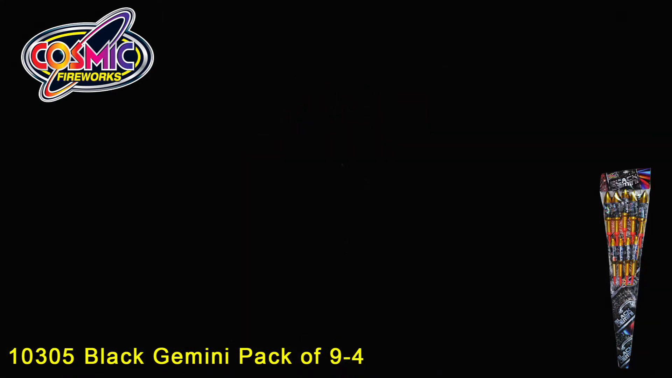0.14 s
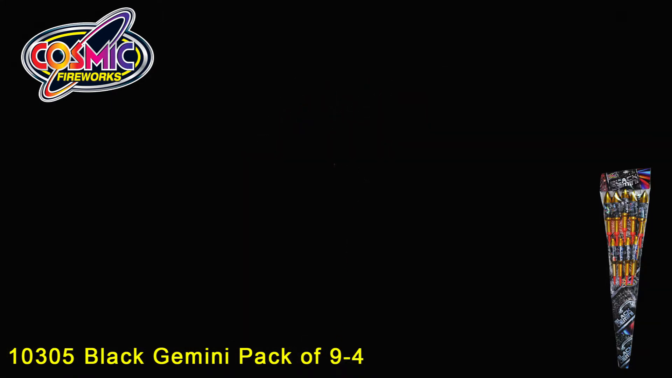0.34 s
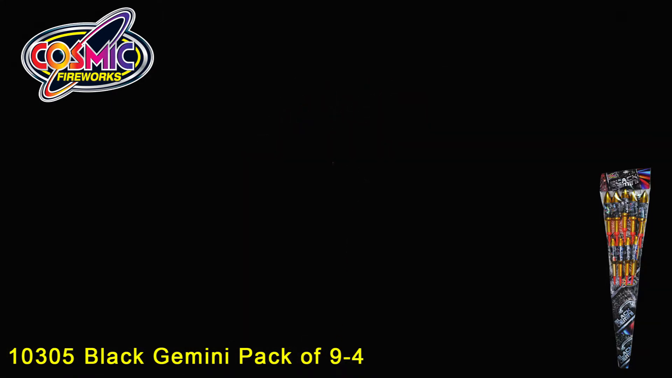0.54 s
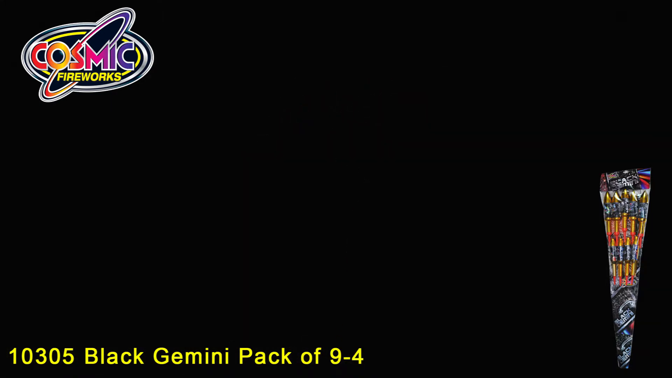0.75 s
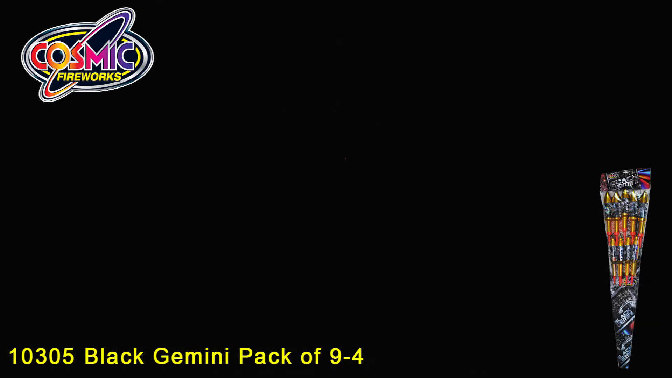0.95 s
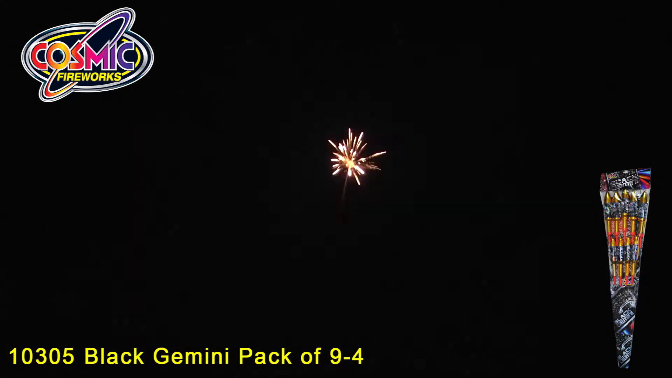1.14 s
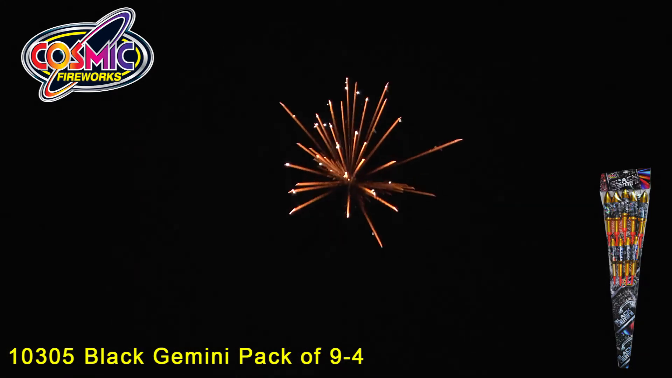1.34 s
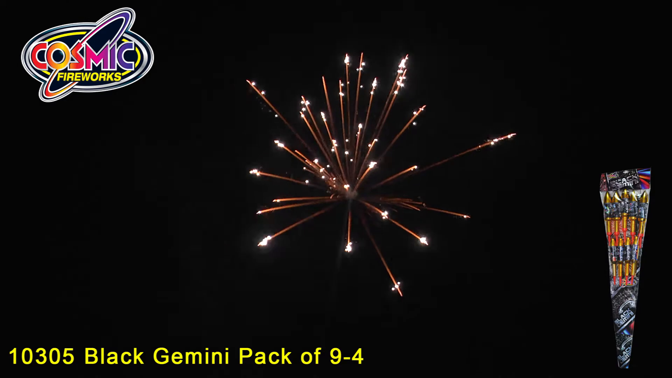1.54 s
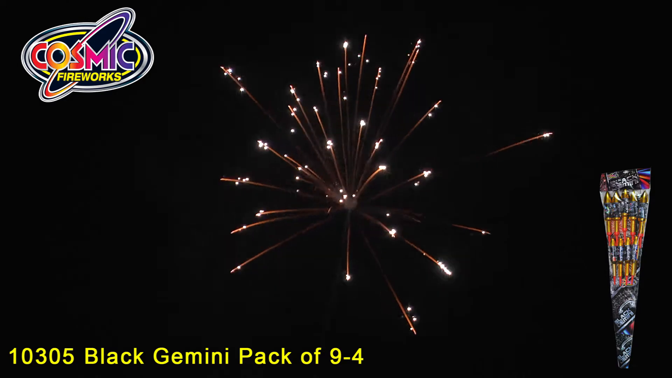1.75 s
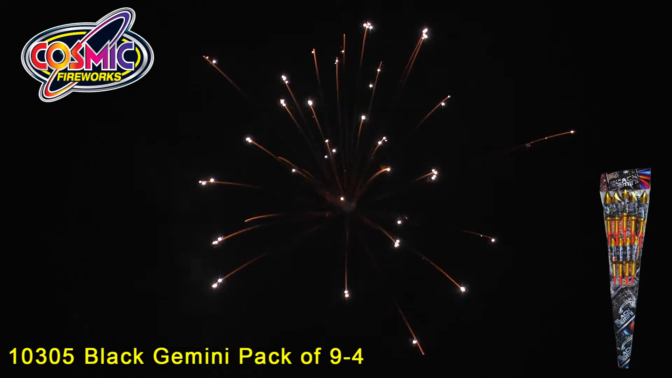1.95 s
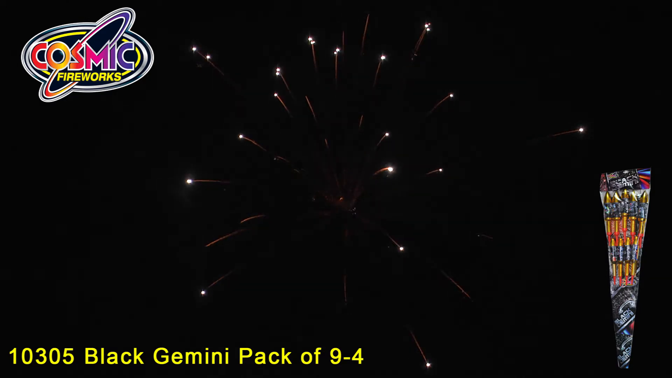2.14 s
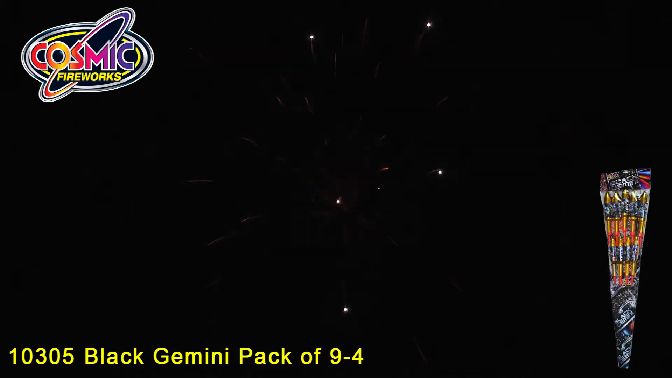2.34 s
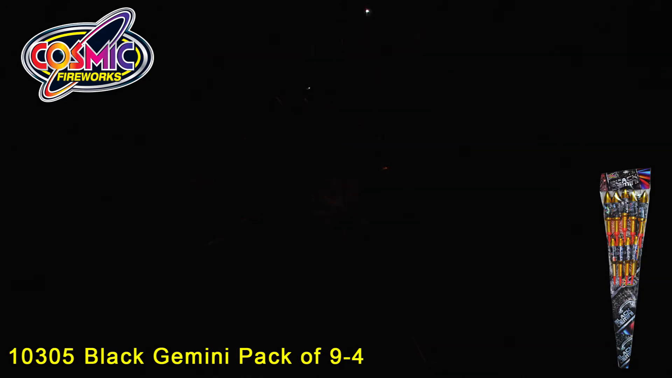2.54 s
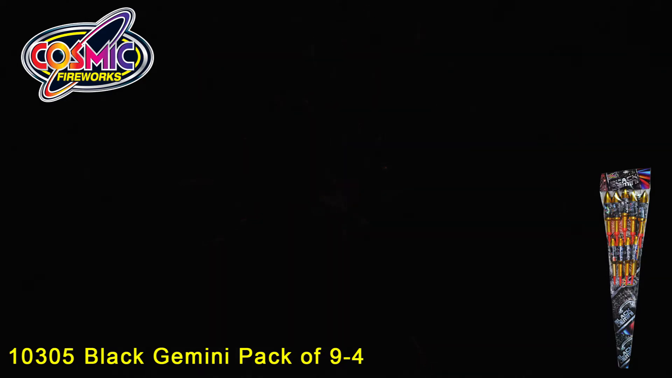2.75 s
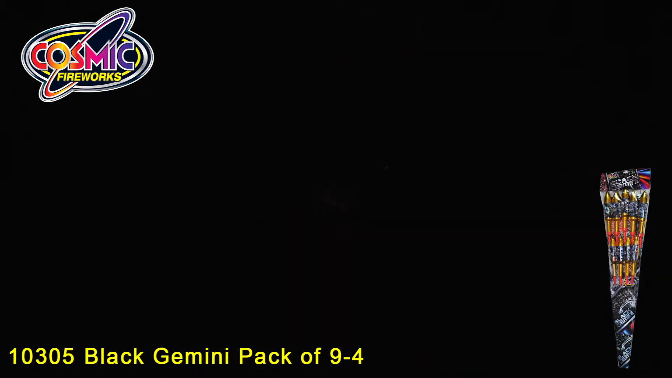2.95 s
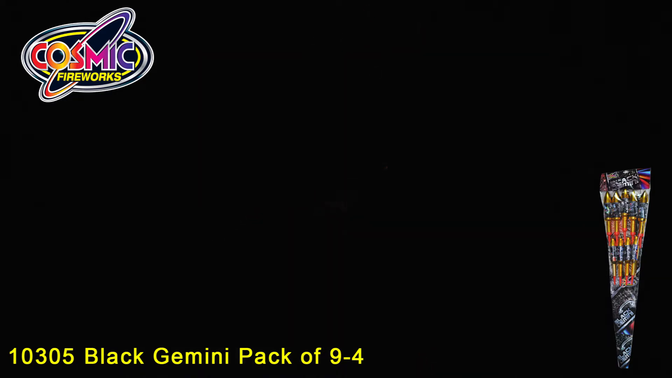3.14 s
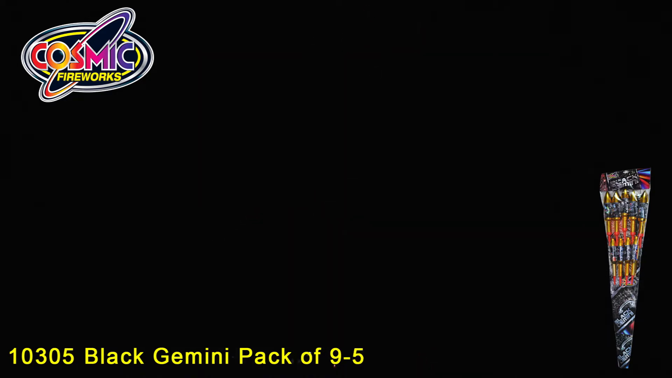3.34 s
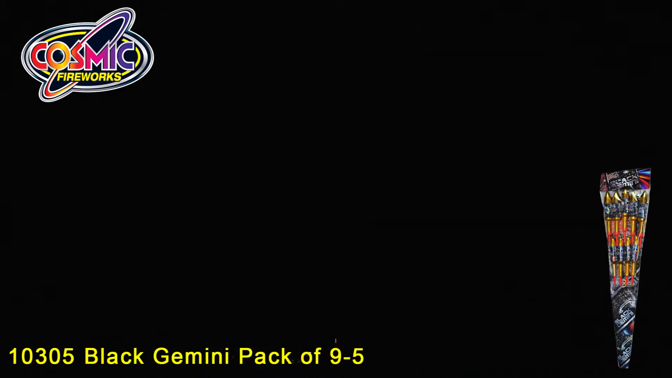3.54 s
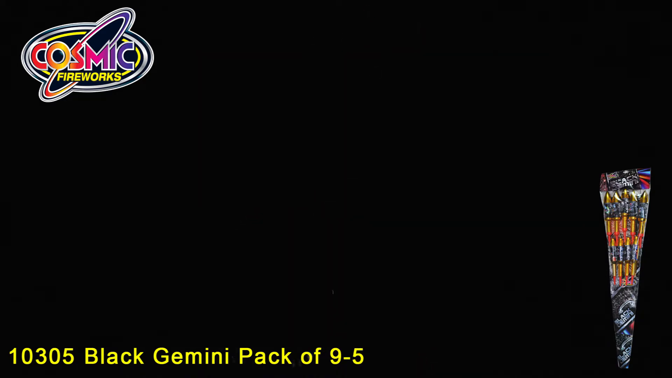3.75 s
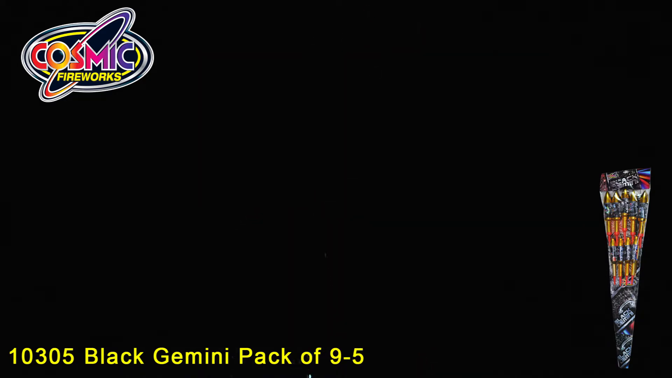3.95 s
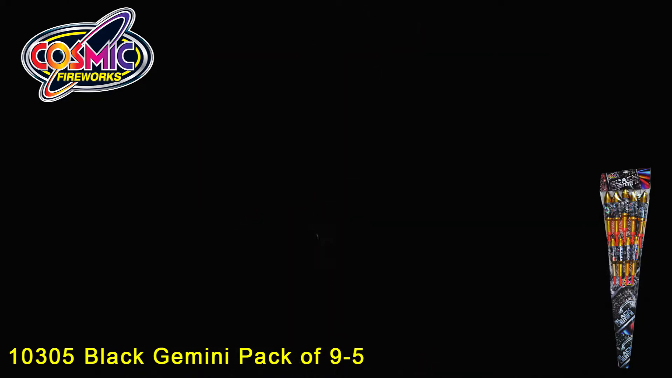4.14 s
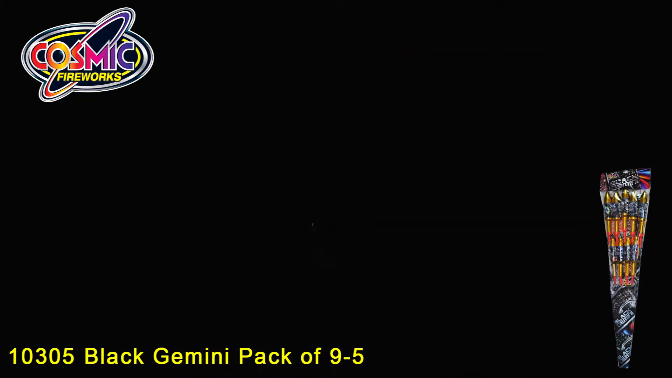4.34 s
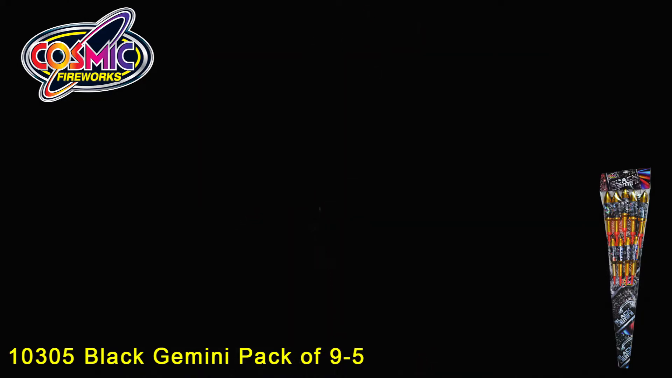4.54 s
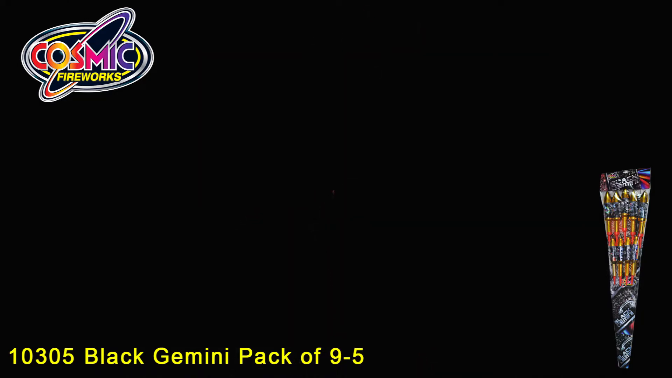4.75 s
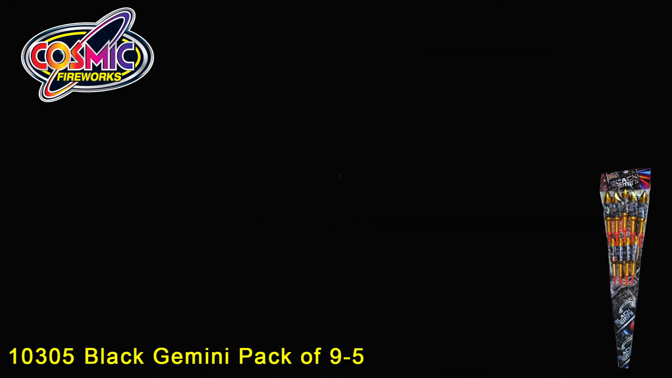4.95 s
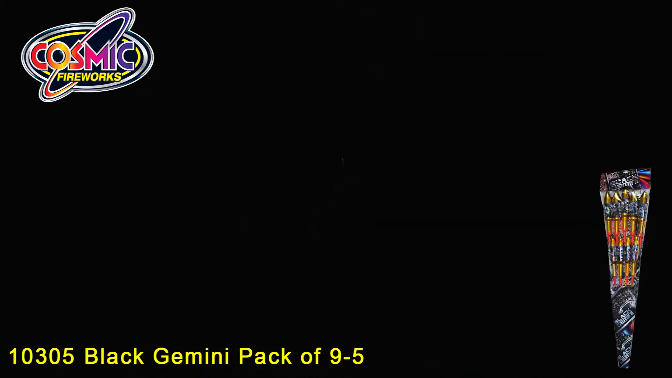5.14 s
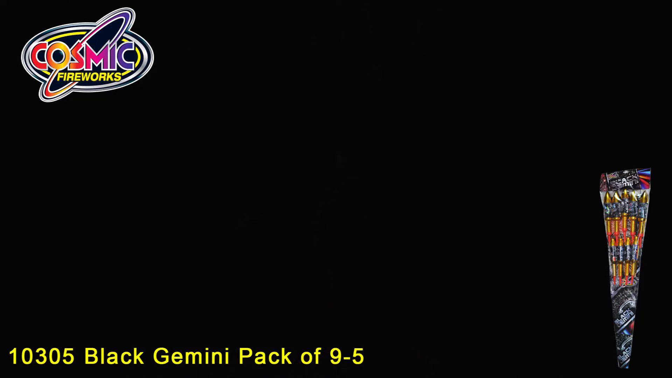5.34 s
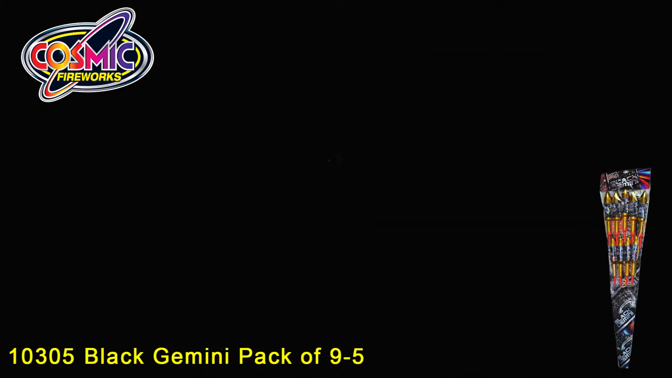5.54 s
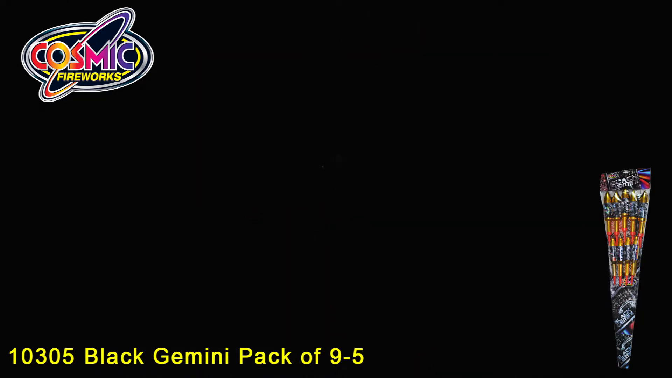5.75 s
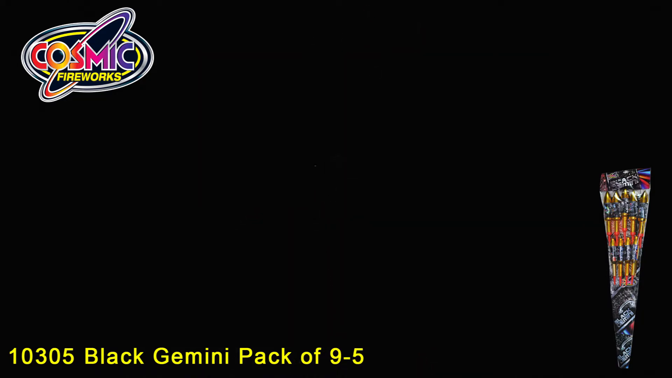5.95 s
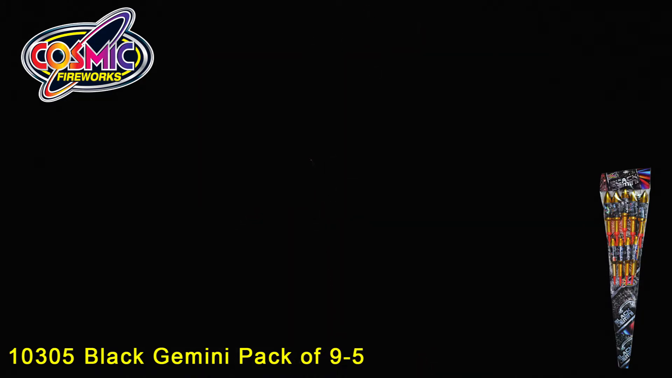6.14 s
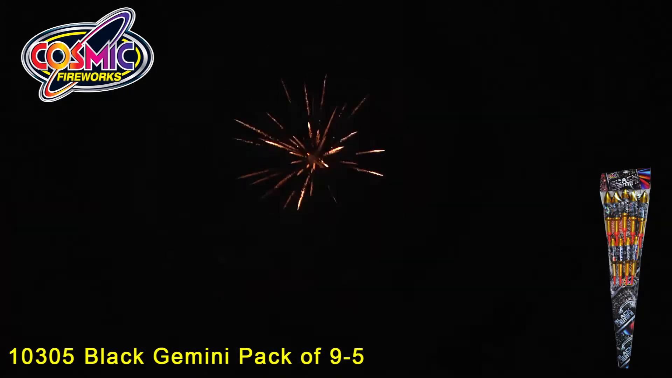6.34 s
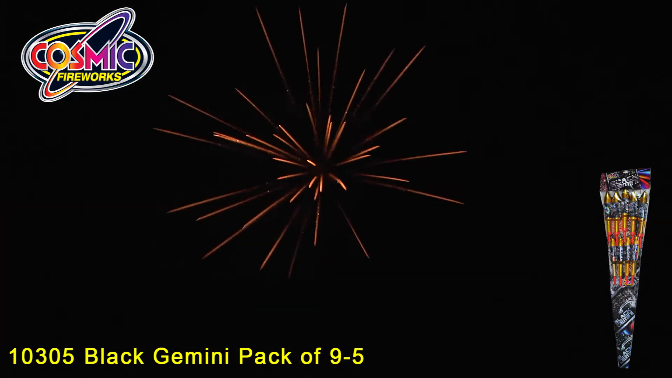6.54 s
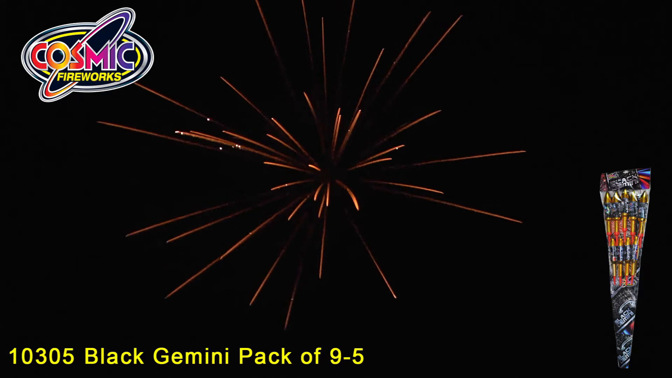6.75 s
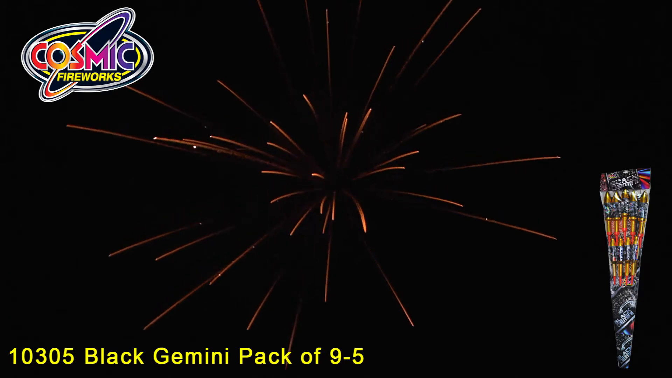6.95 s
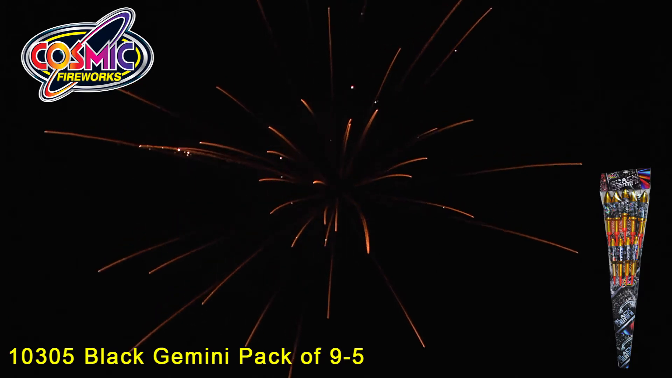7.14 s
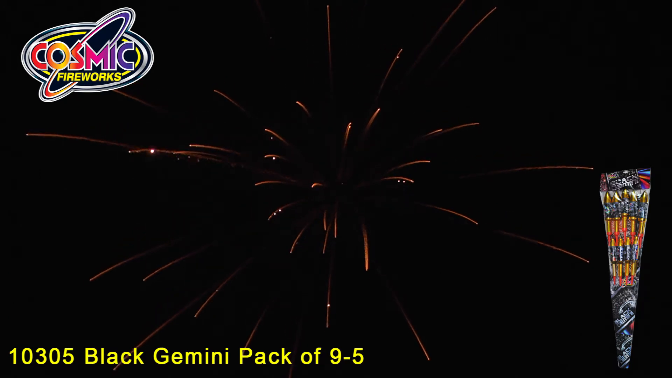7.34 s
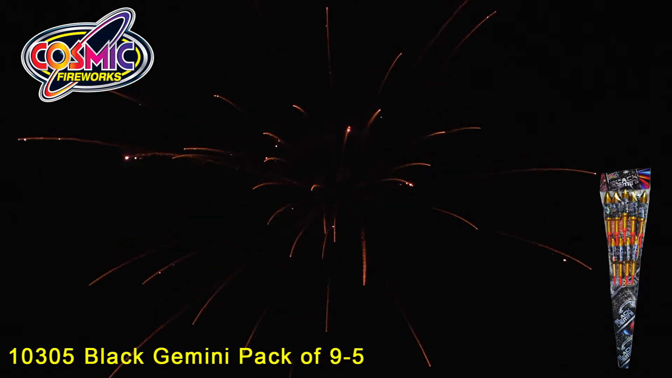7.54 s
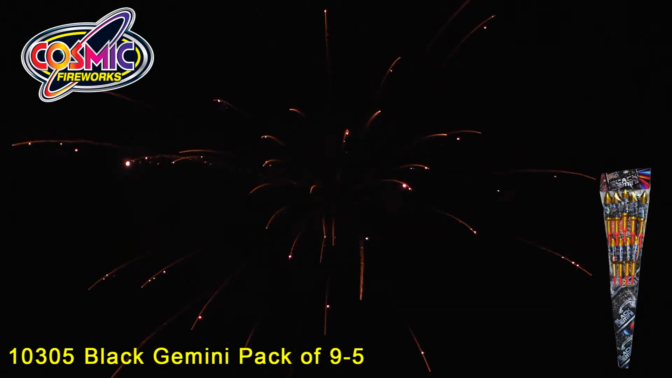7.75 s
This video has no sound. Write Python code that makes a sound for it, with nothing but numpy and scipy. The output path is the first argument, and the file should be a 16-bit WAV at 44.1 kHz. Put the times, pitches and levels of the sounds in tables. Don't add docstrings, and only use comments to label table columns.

```python
import sys
import numpy as np
from scipy import signal
from scipy.fft import rfft, irfft
from scipy.io import wavfile
from scipy.ndimage import uniform_filter1d, map_coordinates

SR = 44100
rng = np.random.default_rng(int(sys.argv[2]) if len(sys.argv) > 2 else 0)


def to_wav(sig):
    pcm = np.clip(np.atleast_2d(sig), -1, 1) * 32767
    pcm = np.round(pcm).astype(np.int16)
    wavfile.write(sys.argv[1], SR, pcm.T)


def boost_factor(decibels):
    exponent = np.asarray(decibels, float) / 20
    return 10 ** exponent


N = 342945
CUT_S = 3.227

# start in seconds, end of the rebound in ms, overload depth, overshoot (both re full scale).
BLASTS = [
    (1.45633, .437, 6.6, 2.85),
    (6.56757, .371, 4.45, 2.05),
]
# first echo in seconds, end of near land in seconds, low roll level in dB,
# bright splash level in dB, step down to far land in dB.
LAND = [
    (1.488, 1.659, -16.5, -25.5, -2.5),
    (6.597, 6.903, -19.5, -28, 0.5),
]
# frequency in Hz, likeness from -1 to 1.
SKY_ALIKE = [(60, 1.0), (130, 1.0), (290, 1.0), (640, 0.98), (1410, 0.93), (3100, 0.77), (6820, 0.37),
             (15000, -0.19)]


def unit(x):
    return x / np.sqrt(np.mean(x ** 2) + 1e-20)


def along(points, hz):
    f, v = np.transpose(points)
    return np.interp(np.log(hz + 1), np.log(f + 1), v)


def wobble(rate_hz):
    return map_coordinates(rng.standard_normal(int(N * rate_hz / SR) + 4), [np.arange(N) * rate_hz / SR])


def since(start_s, until_s):
    t = np.arange(N) / SR
    return np.maximum(t - start_s, 0), (t >= start_s) & (t < until_s)


def coloured(x, spectrum):
    cepstrum = irfft(np.log(boost_factor(along(spectrum, np.fft.rfftfreq(8192, 1 / SR))) + 1e-6))
    cepstrum[1:4096] *= 2
    cepstrum[4097:] = 0
    h = irfft(np.exp(rfft(cepstrum)))[:4096]
    return signal.fftconvolve(np.atleast_2d(x), h[None] / np.linalg.norm(h), axes=1)[:, :N]


def ports(pair, alike):
    turn = np.arccos(np.clip(along(alike, np.fft.rfftfreq(N, 1 / SR)), -1, 0.994)) / 2
    mid, side = irfft(rfft(pair) * [np.cos(turn), np.sin(turn)], N)
    return np.array([mid + side, mid - side])


def rush(spectrum, alike, lumps_db, rate_hz):
    noise = boost_factor(lumps_db * wobble(rate_hz)) * rng.standard_normal((2, N))
    return unit(ports(coloured(noise, spectrum), alike))


def night():
    # frequency in Hz, density in dB per Hz.
    air_tones = [
        [(40, -7.5), (120, 2), (300, -2), (450, -6.5), (900, -14.5), (1700, -19.5), (2500, -11.5), (3100, -12), (3900, -20), (5000, -18), (6200, -4), (7400, -18), (9200, -23), (15500, -45)],
        [(40, -8.5), (120, 5), (300, -3.5), (450, -8), (1700, -17.5), (2800, -6.5), (3900, -17), (5000, -8.5), (6300, -1), (8200, -14.5), (9200, -11.5), (10300, -35.5), (11700, -20), (15500, -47)],
    ]
    # frequency in Hz, likeness.
    night_alike = [(60, 1), (640, 0.98), (1400, 0.98), (3100, 1), (6800, 0.25), (15000, 0.89)]
    # frequency in Hz, left over right in dB.
    night_side = [(60, 2.5), (110, 0), (200, 0), (380, -0.5), (700, 0.5), (1290, -0.5), (2380, -2),
                  (4400, -4.5), (8120, -2), (15000, -2.5)]
    # centre in Hz, width in Hz, pulses per second, pulses per group.
    cricket_songs = [(2350, 120, 41, 3), (5850, 260, 35.5, 40), (6200, 480, 71, 5), (6700, 250, 35.5, 40),
                     (7600, 700, 41, 3)]
    # level before the cut in dB, level after in dB, left over right in dB.
    cricket_spots = [(-32, -20, -10), (-32, -18, -20), (-21, -9.5, -12), (-9, -14, -2), (-46, -23.5, -14)]
    duck_depth_db, duck_recovery_s, lead_s = 17.5, 0.92, 70e-6

    t, hz = np.arange(N) / SR, np.fft.rfftfreq(N, 1 / SR)
    first_shot = t < CUT_S
    before, after = (rush(tone, night_alike, lumps_db=-0.2, rate_hz=7.2) for tone in air_tones)
    balance = boost_factor(np.outer([0.5, -0.5], along(night_side, hz)))
    lean = balance * np.exp(np.outer([-1j, 1j], np.pi * hz * lead_s))
    air = irfft(rfft(np.where(first_shot, before, after)) * lean, N)

    chorus = 0
    for (centre_hz, width_hz, rate_hz, group), (before_db, after_db, pan_db) in zip(cricket_songs, cricket_spots):
        band = np.exp(-((hz - centre_hz) / width_hz) ** 2)
        song = irfft(rfft(rng.standard_normal((2, N))) * band, N)
        pulses = (1 + np.cos(2 * np.pi * rate_hz * t + wobble(5))) ** 1.2
        pulses *= 1 + 0.6 * np.cos(2 * np.pi * rate_hz / group * t)
        level_db = np.where(first_shot, before_db, after_db) + np.array([[pan_db], [-pan_db]]) / 2
        chorus += unit(song * pulses) * boost_factor(level_db)

    duck_db = 0
    for blast, until_s in zip(BLASTS, (CUT_S, np.inf)):
        lag_s, gate = since(blast[0], until_s)
        duck_db = duck_db + duck_depth_db * np.exp(-lag_s / duck_recovery_s) * gate
    air_db = np.where(first_shot, -48.5, -46.5)
    chorus_db = np.where(first_shot, -51, -44.5)
    return boost_factor(air_db - duck_db) * air + boost_factor(chorus_db - duck_db) * chorus


def bush_cricket():
    # start in seconds, level in dB.
    chirps = [(.33, -72), (.77, -78), (.93, -77), (1.21, -74), (4.274, -58), (4.952, -62), (5.614, -61),
              (6.34, -59), (7.19, -75)]
    tooth_lines = [-5, -2, -4, -3, -8, 0, 0, -2, -12]
    chirp_s, lowest_hz, spacing_hz = 0.085, 10573, 380
    out, t = np.zeros((2, N)), np.arange(round(chirp_s * SR)) / SR
    for start_s, db in chirps:
        comb = 0
        for k, line_db in enumerate(tooth_lines):
            strength = boost_factor(line_db + rng.normal(0, 1.1, (2, 1)))
            phase = (lowest_hz + spacing_hz * k) * t + rng.random((2, 1))
            comb = comb + strength * np.sin(2 * np.pi * phase)
        swell = np.sin(np.pi * t / chirp_s) ** 0.5
        out[:, round(start_s * SR):][:, :len(t)] += boost_factor(db - 2) * comb * swell
    return out * boost_factor([[-1.5], [1.5]])


def knocks():
    # start in seconds, peak in dB, clatter in dB.
    hits = [
        (4.7381, -7.5, -3.5),
        (4.7458, -23, -8),
        (4.7531, -9.5, -13),
    ]
    # frequency in Hz, level in dB, 60 dB decay in seconds.
    wood_modes = [(150, 2.5, 0.16), (628, 0, 0.18)]
    # frequency in Hz, density in dB per Hz.
    clatter_tone = [(180, -31), (300, -4), (1110, -3.5), (1270, -14), (1420, -8), (2250, -7), (2920, 1),
                    (3440, -14.5), (6000, -19), (15000, -58)]
    body, clatter, t = np.zeros(N), np.zeros(N), np.arange(SR // 4) / SR
    for start_s, db, clatter_db in hits:
        ring = 0
        for hz, mode_db, t60_s in wood_modes:
            phase = 2 * np.pi * hz * t + wobble(51)[:len(t)]
            ring = ring + boost_factor(mode_db - 17 - 60 * t / t60_s) * np.sin(phase)
        ring = ring * (1 - np.exp(-t / 0.0015))
        thud = -np.sin(2 * np.pi * 240 * t) * boost_factor(-13 - 60 * t / 0.067)
        burst = rng.standard_normal(len(t)) * boost_factor(clatter_db + 10.5) * (t / 0.002) * np.exp(-t / 0.0016)
        first = round(start_s * SR)
        body[first:][:len(t)] += boost_factor(db) * (ring + thud)
        clatter[first:][:len(t)] += boost_factor(db) * burst
    return body - uniform_filter1d(body, size=500) + coloured(clatter, clatter_tone)


def lift_off():
    # frequency in Hz, density in dB per Hz.
    jet_tone = [(180, -42), (300, -20), (562, -0.5), (892, -2.5), (1050, -4), (1240, 0), (1490, -5.5),
                (1730, -1), (2740, 3.5), (4350, -11.5), (5480, -2), (6250, -5.5), (10100, -23.5),
                (11500, -19), (15500, -44)]
    roar_tone = [(29, -50), (50, -21), (124, 1.5), (192, 1), (322, -18.5), (420, -23), (550, -39),
                 (920, -120)]
    ignition_s, lighting_s, motor_out_s = 3.403, 0.049, 3.96
    spool_s, spool_db = 0.16, 20.5
    hiss_db, roar_db = -21.5, -36
    cutoff_db_per_s, trail_db_per_s = 164, 41.5

    t, gate = since(ignition_s, np.inf)
    out_s = since(motor_out_s, np.inf)[0]
    thrust = gate * (t / (t + lighting_s)) ** 2 * boost_factor(-spool_db * np.exp(-t / spool_s))

    def fade(trail_db):
        return np.maximum(boost_factor(-cutoff_db_per_s * out_s), boost_factor(trail_db - trail_db_per_s * out_s))

    hiss = boost_factor(hiss_db) * fade(trail_db=-7.5) * rush(jet_tone, SKY_ALIKE, lumps_db=1.0, rate_hz=90)
    roar = boost_factor(roar_db) * fade(trail_db=-7) * rush(roar_tone, SKY_ALIKE, lumps_db=1.5, rate_hz=21)
    return thrust * (hiss + roar)


def crackle():
    # start in seconds, peak in dB.
    last_pops = [(2.804, -13), (2.8139, -13), (2.819, -21), (2.8274, -21), (2.8444, -28), (2.9054, -14.5),
                 (2.9257, -23), (2.9426, -14.5), (2.9483, -13), (2.9892, -25), (3.016, -25), (3.0247, -21),
                 (3.0296, -17), (3.1083, -27.5), (3.1976, -23.5)]
    # frequency in Hz, density in dB per Hz.
    pop_tone = [(240, -32.5), (400, -5), (615, -7), (862, -2.5), (1070, -7.5), (1690, -4), (2010, -4.5),
                (2530, 0), (3130, -2), (4060, -16.5), (5750, -6), (7900, -20), (9310, -17), (14300, -40),
                (15700, -51)]
    lit_s, catch_s, catch_db = 1.669, 0.1, 28.5
    burnout_s, burnout_soft_s, burnout_db_per_s = 2.494, 0.068, 44.5
    pops_per_s, thinning, crowd_ends_s = 1300, 1.05, 2.78
    pop_db, nearing_db_per_s, blur_db = -15, 5.5, -21

    t, gate = since(lit_s, CUT_S)
    dying_s = burnout_soft_s * np.logaddexp(0, (t + lit_s - burnout_s) / burnout_soft_s)
    burn_db = -catch_db * np.exp(-t / catch_s) - burnout_db_per_s * dying_s
    density = pops_per_s * boost_factor(thinning * burn_db) / SR * since(lit_s, crowd_ends_s)[1]
    fires = (rng.random(N) < density) * rng.choice([-1, 1], N) * boost_factor(4 * rng.standard_normal(N))
    fires *= boost_factor(pop_db + nearing_db_per_s * t) * gate
    pops = ports([fires, fires * rng.choice([-1, 1], N)], SKY_ALIKE)
    for start_s, db in last_pops:
        pan_db = -2 + rng.normal(0, 1.9)
        pops[:, round(start_s * SR)] += boost_factor(db + 10.5 + np.array([pan_db, -pan_db]) / 2) * rng.choice([-1, 1])

    fall_db_s = 60 * np.arange(1500) / SR
    smear = rng.standard_normal((2, 1500)) * (boost_factor(-19 - fall_db_s / 0.007) + boost_factor(-27 - fall_db_s / 0.04))
    smear[1] = 0.85 * smear[0] + 0.5 * smear[1]
    smear[:, 0] = 1
    smear /= np.linalg.norm(smear[0])
    sharp = coloured(signal.fftconvolve(pops, smear, axes=1)[:, :N], pop_tone)
    blur = gate * boost_factor(blur_db + burn_db) * rush(pop_tone, SKY_ALIKE, lumps_db=0.5, rate_hz=55)
    return sharp + blur


def answer(column, fade_db_per_s):
    first_db, first_s, hills_db = 9.5, 0.004, -1.5
    out = 0
    for row in LAND:
        echo_s, near_ends_s, far_step_db = row[0], row[1], row[4]
        t, gate = since(echo_s, CUT_S if echo_s < CUT_S else np.inf)
        fading_db = far_step_db - fade_db_per_s * t + hills_db * wobble(11)
        far_db = np.where(t < near_ends_s - echo_s, 0, fading_db)
        out = out + gate * boost_factor(row[column] + first_db * np.exp(-t / first_s) + far_db)
    return out


def echoes():
    # frequency in Hz, density in dB per Hz.
    roll_tone = [(24, -75), (40, -14.5), (113, -4.5), (173, -1.5), (205, -2.5), (324, -1), (437, -7),
                 (483, -9.5), (1200, -17.5), (1560, -26), (2640, -120)]
    splash_tone = [(350, -24.5), (600, 1), (756, -3.5), (1220, -10), (2220, -12.5), (2540, -12),
                   (3420, -16.5), (4260, -28.5), (6150, -19), (7240, -28.5), (8870, -30), (10700, -41),
                   (13000, -36), (15500, -61)]
    # start in seconds, peak in dB.
    slaps = [(1.49, -3), (1.66, 15), (6.615, 10), (6.653, -5), (6.742, 7), (6.784, -14), (6.892, -12)]
    # start in seconds, peak in dB, frequency in Hz.
    booms = [(1.494, -2, 288), (1.559, -10.5, 163), (1.594, -7, 315), (1.621, -7, 350), (1.644, -3, 310),
             (1.654, -5.5, 212), (1.735, -8, 303), (1.849, -8.5, 353), (6.604, -5.5, 147),
             (6.624, -1.5, 272), (6.654, -2.5, 226), (6.743, -4.5, 308), (6.765, -6, 248), (6.785, -7, 268),
             (6.8, -5.5, 210), (6.855, -12, 220), (6.895, -8, 300), (6.959, -11.5, 350), (7.217, -15, 150)]
    # start in seconds, peak in dB,
    # frequency in Hz.
    bumps = [(3.108, -22, 960), (4.634, -37, 155.5), (4.665, -34, 192)]
    slap_ms, dulling_s = 0.16, 0.17

    roll = uniform_filter1d(answer(column=2, fade_db_per_s=11.5), size=400)
    roll = roll * rush(roll_tone, SKY_ALIKE, lumps_db=2.0, rate_hz=45) * boost_factor(-1.5)
    splash = uniform_filter1d(answer(column=3, fade_db_per_s=11), size=150)
    splash = splash * rush(splash_tone, SKY_ALIKE, lumps_db=0.5, rate_hz=120)

    bright = 0
    for row in LAND:
        lag_s, gate = since(row[0], np.inf)
        bright = bright + np.exp(-lag_s / dulling_s) * gate
    splash = bright * splash + (1 - bright) * uniform_filter1d(splash, size=3, axis=1)

    single, t = np.zeros(N + 1500), np.arange(1500) / SR
    for start_s, db in slaps:
        u = t * 1000 / slap_ms
        single[round(start_s * SR):][:1500] += boost_factor(db - 3.0) * (1 - u) * np.exp(-u) * np.minimum(t * SR / 14, 1)
    for start_s, db, hz in booms + bumps:
        u = t * hz / 0.71
        tone = np.sin(2 * np.pi * (hz * t + rng.random()))
        single[round(start_s * SR):][:1500] += boost_factor(db + 4.5) * u * np.exp(-u) * tone
    return roll + splash + ports([single[:N], np.roll(single[:N], 40)], SKY_ALIKE)


def blasts():
    push_ms, recovery_s, settling_s = 0.122, 0.037, 0.082
    out = np.zeros(N)
    for start_s, rebound_ms, depth, overshoot in BLASTS:
        t = np.arange(N) / SR - start_s
        creep = overshoot * np.exp(-np.abs(t) / settling_s) - depth * np.exp(-np.abs(t) / recovery_s)
        inside_ms = np.minimum(t * 1000 - push_ms, rebound_ms - t * 1000)
        rebound = np.clip(inside_ms * 28 + 0.5, 0, 1)
        onset = np.clip(t * 30000, 0, 1)
        out += onset * (np.maximum(creep, -1.5) + 3 * rebound)
    return out


def scene():
    return night() + bush_cricket() + knocks() + lift_off() + crackle() + echoes() + blasts()


def band_limit(x):
    return signal.sosfilt(signal.butter(12, 15830, fs=SR, output="sos"), x)


def record(dry):
    droop_s, top_hz = 0.192, 15830
    clipped = np.clip(dry, -1, 1)
    coupled = signal.lfilter([1, -1], [1, -np.exp(-1 / (droop_s * SR))], clipped)
    limited = irfft(rfft(coupled) * (np.fft.rfftfreq(N, 1 / SR) < top_hz), N)
    return band_limit(limited)


dry = scene()
out = record(dry)
to_wav(out)
```